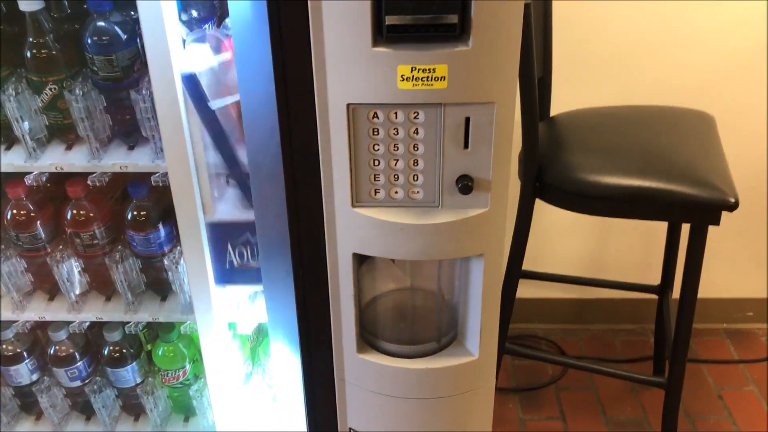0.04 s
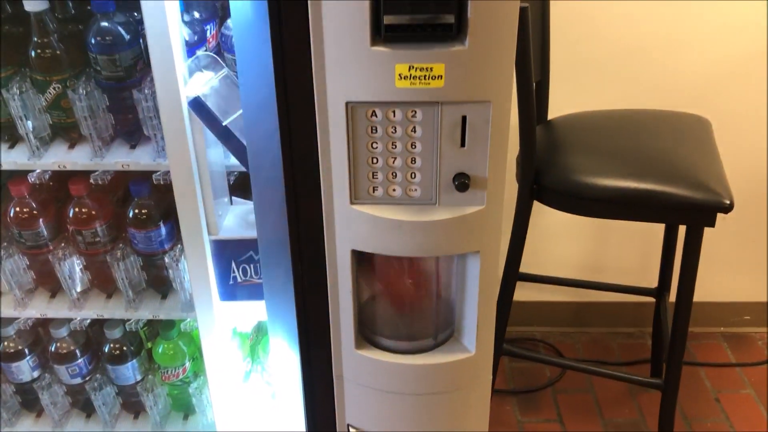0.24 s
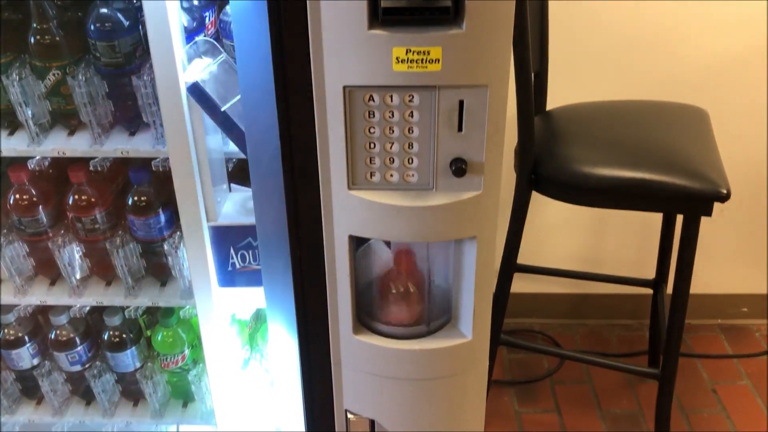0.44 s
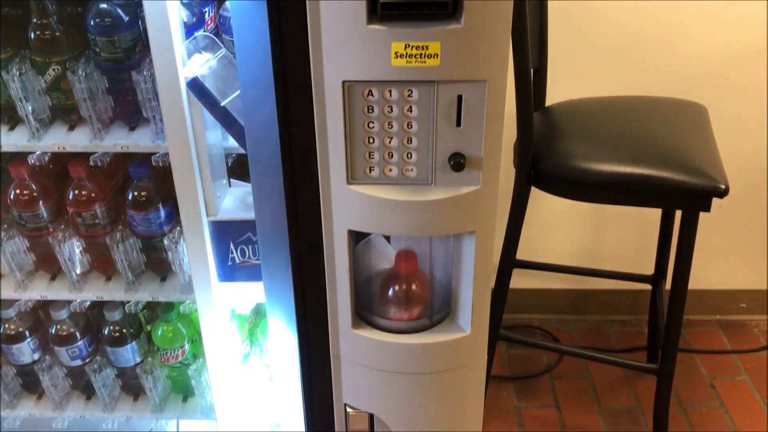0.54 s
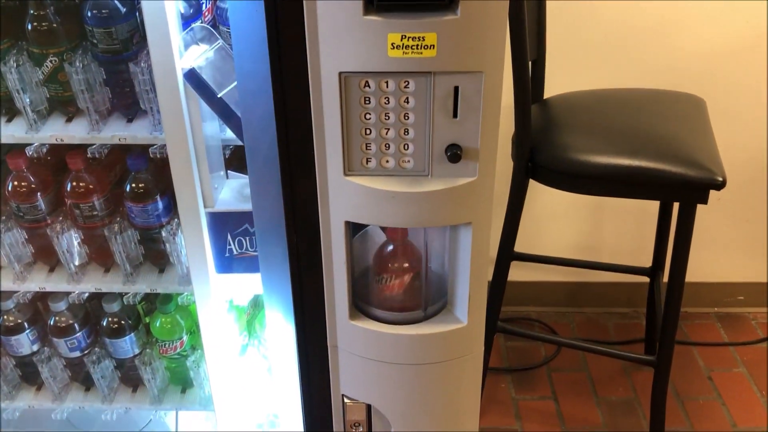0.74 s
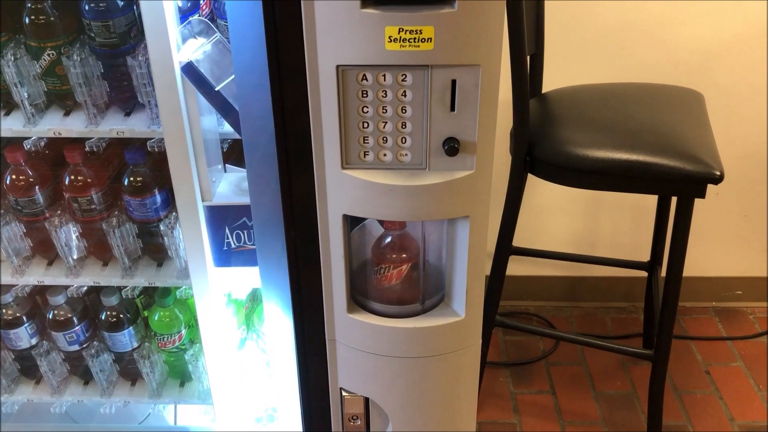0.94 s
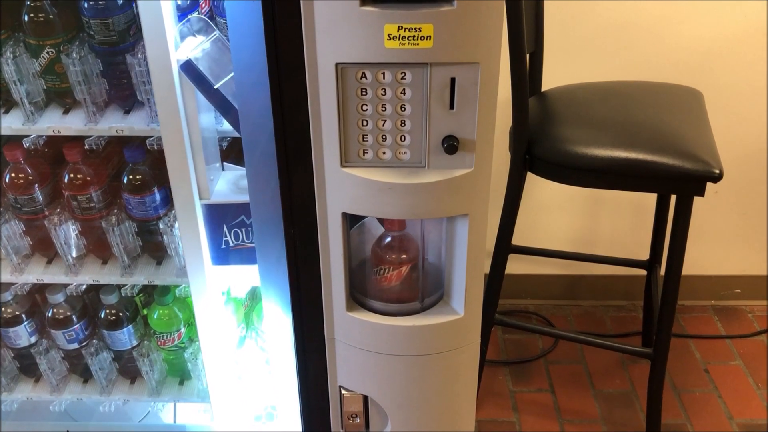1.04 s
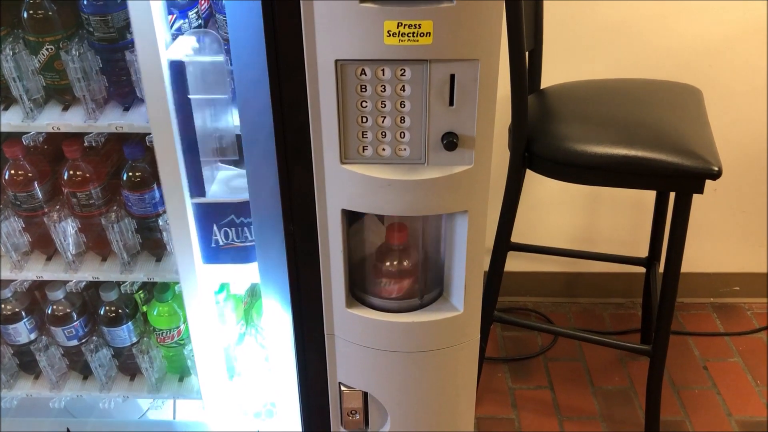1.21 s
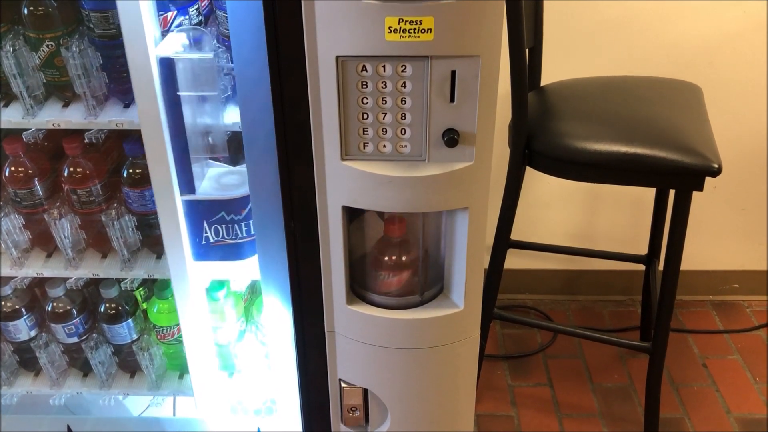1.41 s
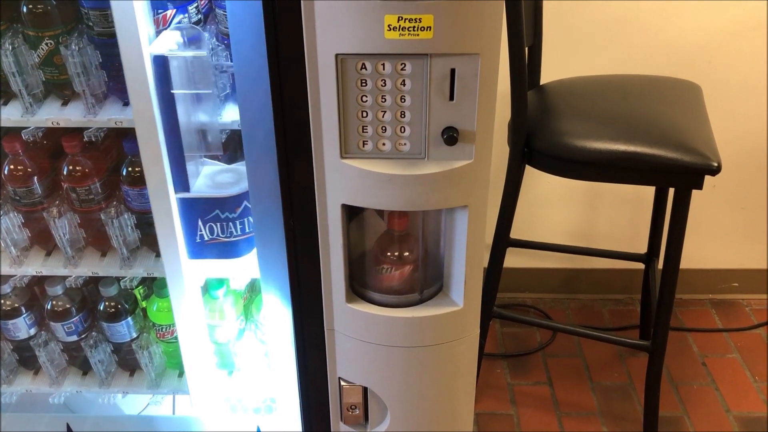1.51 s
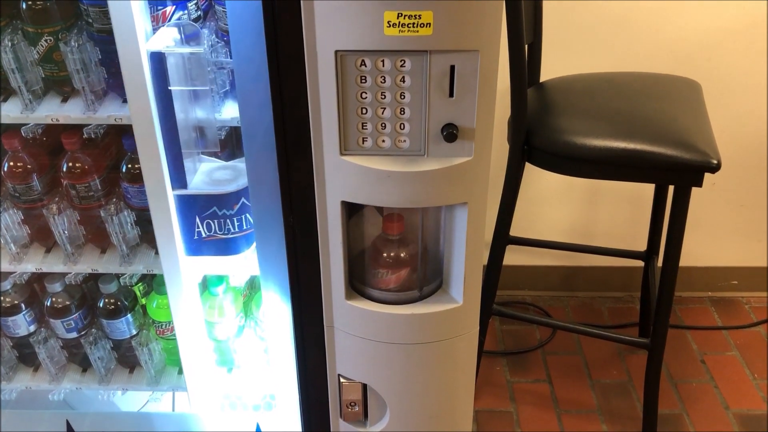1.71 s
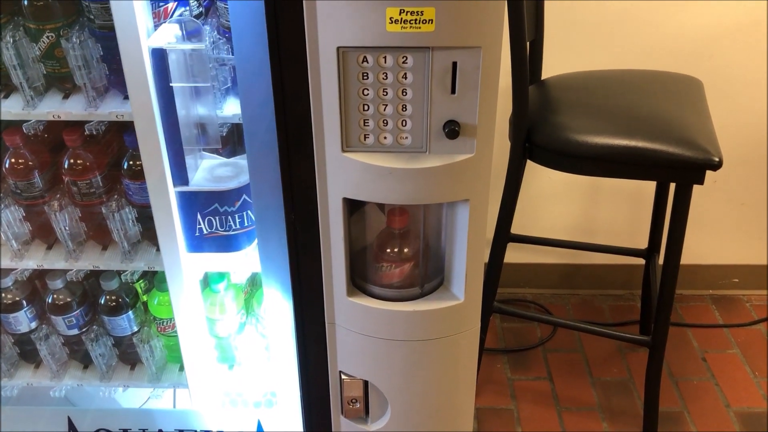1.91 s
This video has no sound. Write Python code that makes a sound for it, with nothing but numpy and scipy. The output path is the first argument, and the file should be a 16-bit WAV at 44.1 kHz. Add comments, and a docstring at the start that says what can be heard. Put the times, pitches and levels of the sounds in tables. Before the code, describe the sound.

A plastic bottle clatters down a vending machine's chute, thuds into the delivery port and rattles to rest. Then a steel latch snaps and the mechanism clunks twice, over a low cooling hum in a hard-floored room.

```python
"""A vending machine's cooling unit hums from start to finish. First a gate clicks open and a plastic
bottle knocks down the chute, ringing the delivery cup, crackling and cracking against edges.
It thuds into the port, shaking the cabinet, and rattles to rest. Then a steel latch ticks and snaps,
and the mechanism clunks twice, shaking the cabinet again. Every blow rings the cabinet's panels
and dies away in a hard-floored room."""
import sys
import numpy as np
from scipy import signal
from scipy.fft import rfft, irfft
from scipy.io import wavfile
from scipy.ndimage import uniform_filter1d

SR = 44100
rng = np.random.default_rng(int(sys.argv[2]) if len(sys.argv) > 2 else 0)


def materialize(psi):
    """Save the field psi as 16-bit PCM at rate SR to the path in sys.argv[1].

    A 1-D psi becomes a single channel; in a 2-D psi each row is a channel.
    """
    bounded = np.clip(np.atleast_2d(psi).T, -1, 1)
    quanta = np.round(bounded * 32767).astype(np.int16)
    wavfile.write(sys.argv[1], SR, quanta)


N = 85995

# motor and fan tones: pitch_hz, level_db, waver_db
HUM_TONES = [(117, -72, 4), (154, -57.5, 3), (232, -62, 4), (250, -66.5, 3), (306, -68, 4),
             (370.5, -57, 1.3)]
# tone colour of the fan's moving air: pitch_hz, level_db
AIR_COLOUR = [(18, -65), (30, -23), (100, -12.5), (134, -9.5), (252, -6.5), (311, -17.5), (384, -8),
              (449, -19), (666, -21), (740, -24.5), (1190, -30), (1630, -34), (2120, -41), (8520, -53.5),
              (16000, -59)]
# the bottle's blows; thud to tick are five bands, low to high, each added to level_db:
# start_s, level_db, thud_db, boom_db, knock_db, clack_db, tick_db, fade_factor
BOTTLE_HITS = [ (0.078, -48.5, -22, 2.5, -3, -3.5, -2, 1.3), (.108, -51, 6.5, 2, -3, -12.5, -30, 3.9),
               (.137, -44, -9, -1.5, -6, -12, -10.5, 2.6), (0.158, -46.5, -2, 2, -5, -7, -6.5, 1.1),
               (0.186, -47, -10.5, 8, -3, -6.5, -10, 4.8), (.225, -30.5, -16, -5.5, -3.5, -2, -5, 1),
               (.263, -49, -6, -11.5, 4, -5, 0.5, 2.6), (.278, -36, 6.5, -16, -4, -2, 0.5, 1.1),
               (.283, -34, -9, -13, 4, 1.5, 1, 0.5), (.289, -28.5, -6, 2, -1, -3, -3, 0.76),
               (0.31, -31, -17.5, -11, -0.5, -1.5, -4, 0.85), (0.329, -37, -6, 2.5, 3.5, 1.5, -5.5, 1.2),
               (.366, -34, -10.5, 0, 5.5, -5, -12.5, 0.54), (0.377, -28, -12.5, -6, 1, -7.5, -16, 1.4),
               (.396, -36.5, -9, -2, 0, -1, -16, 0.81), (0.407, -27.5, -5, -7.5, 1, -3.5, -6, 1.5),
               (0.427, -27.5, -2, 1.5, -1.5, -0.5, -9, 1.27), (0.44, -36, 1, -5, 5.5, -14, -16, 0.69),
               (0.448, -34.5, -19, 3, -10.5, 0.5, -0.5, 0.79),
               (.460, -27, -22.5, -8, -2.5, -7.5, -5.5, 1.18), (0.485, -27.5, -21, -6.5, 0, -6, -13, 0.47),
               (0.506, -40.5, -13, 4, 4, 0.5, 2.5, 1.6), (.520, -36, -8, 3, 3, 4, -5.5, 1.4),
               (0.528, -31, -20, -8, 4, -19, -15, 0.86), (0.541, -36.5, -3, -9, -13, 4.5, -6, 0.82),
               (0.554, -33, -15, -22, 4.5, 0.5, -6, 1.3), (.566, -41, -10, -11, 6, -4, -2, 1.2),
               (0.582, -33.5, -2.5, 3.5, 4, -2, -7, 1.8), (0.61, -30, -2, -1, -1.5, -5.5, -9.5, 1.37),
               (0.64, -40, -2.5, 2.5, -2.5, 1.5, 0.5, 0.9), (0.656, -36, -6.5, -0.5, 5, -17, -1.5, 0.48),
               (0.67, -41.5, 6.5, -8, 2, -7, -7, 1.15), (0.698, -49.5, 10.5, 0, 4, -19, -11, 0.88),
               (.745, -55, 13, -2, -28, -81, -26, 0.9), (0.797, -57.5, 4.5, 13, -3.5, -18, -4.5, 0.52),
               (.832, -62, 9, 13, -7, -5, -4, 0.82), (0.869, -57, 7.5, 1.5, -7.5, -10, -11, 2.4),
               (.931, -67, 0, -1, -13, -3, -6.5, 2)]
# how the cabinet answers in those bands (a fade is a 60 dB drop): pitch_hz, rise_s, hold_s, fade_s
CABINET_BANDS = [(75.2, 0.0074, 0.0069, .2), (237, 0.012, 0.01, 0.14), (842, 0.0044, 0.0068, 0.17),
                 (2990, 0.0024, 0.0081, 0.11), (8600, 0.0025, 0.0048, 0.086)]
# tone colour of the bottle's blows: pitch_hz, level_db
BOTTLE_COLOUR = [(18, -29), (30, -24), (75, 2), (149, -1.5), (319, -3), (374, -3), (473, -7), (584, -2.5),
                 (780, -6.5), (1010, -7), (1500, -10.5), (3220, -10), (16000, -30)]
# where bottle, chute and port ring: pitch_hz, width_hz, boost_db
PORT_RESONANCES = [(209, 41, 6), (229, 32, 2), (291, 7.1, 3), (372.5, 17, 5.5), (526, 37, 5.5),
                   (591, 9.5, 3.5), (687, 16, 5.5), (819, 12.7, 7.5), (876, 17, 6), (969, 13, 9),
                   (1015.6, 37, 7), (1243, 19, 0.5), (1315, 33, 8), (1698, 12, 9.5), (1905, 29, 4.5),
                   (2019, 37, 8), (3223, 166, 5), (3730, 32, -3.5)]
# notes of the hollow delivery cup: pitch_hz, level_db, fade_s
CUP_NOTES = [(519, -19, .2), (586, -22, .2), (830, -17, .16), (964, -19, .2), (1023, -7.5, .18)]
# clicks of the gate: start_s, level_db, pitch_factor
GATE_CLICKS = [(.080, -49, .84), (.226, -36.5, 1.), (.312, -40, 1.)]
# notes of the gate: pitch_hz, level_db, fade_s
GATE_NOTES = [(520, -5, .2), (905, -4, .1), (1190, -8, .14), (1335, -7, .09), (1600, -9, .1),
              (2003, 0, .13), (2589, -4, .09), (3260, -7, .11), (3967, -8, .08)]
# the bottle striking edges: start_s, level_db, brightness_hz
EDGE_HITS = [(0.2251, -38.5, 6900), (0.2817, -37, 7000), (0.3688, -24, 1710), (.4075, -32.5, 8100),
             (.431, -35, 3600), (.451, -38, 4500), (.464, -30, 6660), (0.509, -45, 5170),
             (0.522, -45, 3000), (.612, -32.5, 2320), (0.6553, -37, 1710), (0.6631, -36.5, 1720)]
# heavy landings: start_s, level_db, pitch_factor
THUMPS = [(.435, -26, 0.936), (1.384, -37, 0.86)]
# lowest notes of the cabinet: pitch_hz, level_db, fade_s
CABINET_NOTES = [(61.6, -2.5, 0.22), (111, -1, 0.041), (162, -4, 0.099)]
# the mechanism's blows: start_s, level_db, thud_db, boom_db, knock_db, clack_db, tick_db, fade_factor
LATCH_HITS = [ (1.128, -63.5, 6, 2, 4, -2.5, -4, 1.9), (1.203, -37, -12, -4, -1.5, 0, -5.5, 0.81),
              (1.241, -48, 6.5, 6, 0, -3.5, -6.5, 2.7), (1.311, -53, 14, 4, 4, -3, -4, 1.),
              (1.324, -38, -8, 0.5, -0.5, -1.5, 0, 1.3), (1.342, -44.5, -7, 8.5, 6, -4, -20, 0.57),
              (1.367, -36.5, -12, 3, -1, -0.5, 0, 0.72), (1.390, -45, 1.5, 4.5, -4.5, -6.5, -16, 3.05)]
# tone colour of the mechanism's blows: pitch_hz, level_db
LATCH_COLOUR = [(18, -31), (30, -24), (59, 5), (93, 2), (295, 2.5), (328, -0.5), (437, -2.5), (540, -11),
                (1010, -9), (2060, -13), (2230, -17.5), (5040, -17.5), (16000, -29)]
# where the panel behind the latch rings: pitch_hz, width_hz, boost_db
PANEL_RESONANCES = [(138, 6.2, 1.5), (195, 7.1, 7), (295, 12.6, 6.5), (445, 30, 7), (824, 15, 6),
                    (1030, 15, 3.5), (1487, 22, 5.5), (1730, 19, -8), (1980, 24, 7), (4970, 240, 5)]
# tick and snaps of the latch: start_s, level_db, pitch_factor
LATCH_SNAPS = [(1.132, -71, 1.22), (1.204, -37.5, 1.), (1.368, -52, 1.)]
# notes of the steel latch: pitch_hz, level_db, fade_s
LATCH_NOTES = [(770, -2, .22), (870, -5, .16), (985, 0, .22), (1198, -4, .13), (1647, -2, .14),
               (1968, -6, .16), (2369, -5, .12), (2570, -1, .11), (2625, -3, .11), (2702, -3, .13),
               (3380, -9, .05), (4255, -8, .17), (4370, -10, .08), (4445, -8, .13), (4820, -16, .15),
               (5240, -11, .14), (6000, -14, .08), (6433, -13, .11)]
# the room's echo: pitch_hz, fade_s, level_db
ROOM_BANDS = [(74.8, 0.47, -9.5), (244, 0.63, -5.5), (820, 0.51, -12.5), (2700, 0.65, -14),
              (5460, 0.54, -12.5), (11600, 0.31, -17.5)]


def gain(db):
    """Turn decibels into a number to multiply by."""
    return 10 ** (np.asarray(db) / 20)


def normalise(x):
    """Scale a sound to an average power of 1."""
    return x / np.sqrt(np.mean(x ** 2))


def fade(age, fade_s):
    """Die away by 60 dB every fade_s seconds."""
    return np.exp(-np.log(1000) * age / fade_s)


def curve(pitches_hz, values):
    """Join points with straight lines across the spectrum, octaves evenly spaced."""
    hz = np.arange(N // 2 + 1) * SR / N
    return np.interp(np.log(np.maximum(hz, 1)), np.log(pitches_hz), values)


def noise_spectrum(colour):
    """The spectrum of a noise with the given tone colour."""
    return rfft(rng.standard_normal(N)) * gain(curve(*np.array(colour).T))


def split(spectrum, bands):
    """Split a spectrum into overlapping sounds, one for each band."""
    centres_hz = [band[0] for band in bands]
    shares = np.array([curve(centres_hz, row) for row in np.eye(len(bands))]) ** 4
    return [irfft(spectrum * share, N) for share in shares / shares.sum(0)]


def wander(rate_hz):
    """A smooth random wobble, about 1 in size."""
    width = max(int(SR / rate_hz), 2)
    smoothed = uniform_filter1d(rng.standard_normal(N), width, mode="wrap")
    return normalise(uniform_filter1d(smoothed, width, mode="wrap"))


def ring(x, resonances):
    """Each resonance boosts or dips a narrow range of pitch and rings on."""
    out = x
    for hz, width_hz, boost_db in resonances:
        ringing = signal.lfilter(*signal.iirpeak(hz, hz / width_hz, fs=SR), x)
        out = out + (gain(boost_db) - 1) * ringing
    return out


def blows(hits, colour, chatter_db, chatter_s=0.00042):
    """Blows ring so many panel notes that they blur into noise; the lows come late and linger."""
    t, out = np.arange(N) / SR, np.zeros(N)
    chatter = normalise(gain(chatter_db * wander(1 / chatter_s)))
    bands = split(noise_spectrum(colour), CABINET_BANDS)
    for k, (band, (hz, rise_s, hold_s, fade_s)) in enumerate(zip(bands, CABINET_BANDS)):
        power = np.zeros(N)
        for start, db, *band_db, fade_factor in hits:
            age = np.maximum(t - start, 0)
            rise = np.sin(np.pi / 2 * np.minimum(age / rise_s, 1)) ** 2
            fall = fade(np.maximum(age - hold_s, 0), fade_s * fade_factor)
            power += (gain(db + band_db[k]) * rise * fall) ** 2
        window = int(SR * max(2 / hz, .006))
        steady = band / np.sqrt(uniform_filter1d(band ** 2, window) + 1e-18)
        out += steady * np.sqrt(power) * (chatter if k > 2 else 1)  # the contact chatters in the treble
    return out


def struck(strikes, notes, rise_s=0.0057, detune=0.00095):
    """Every strike sets an object's notes ringing, each fading at its own rate."""
    age, out = np.arange(SR // 3) / SR, np.zeros(N + SR)
    rise = np.minimum(age / rise_s, 1)
    for start, db, pitch_factor in strikes:
        at = int(start * SR)
        for hz, note_db, fade_s in notes:
            pitch_hz = hz * pitch_factor * (1 + detune * rng.standard_normal())
            tone = np.sin(2 * np.pi * (pitch_hz * age + rng.random()))
            out[at:at + len(age)] += gain(db + note_db) * rise * fade(age, fade_s) * tone
    return out[:N]


def cooling_unit(air_db=-56, waver_hz=7.3, drift=0.0026):
    """Motor and fan tones waver over the rush of moving air."""
    out = gain(air_db) * normalise(irfft(noise_spectrum(AIR_COLOUR), N))
    for hz, db, waver_db in HUM_TONES:
        pitch_hz = hz * (1 + drift * wander(waver_hz))
        tone = np.sin(2 * np.pi * (np.cumsum(pitch_hz) / SR + rng.random()))
        out += gain(db) * normalise(tone * gain(waver_db * wander(waver_hz)))
    return out


def bottle_knocks(level_db=-3.5):
    """The full bottle knocks down the chute and rocks in the port."""
    return gain(level_db) * ring(blows(BOTTLE_HITS, BOTTLE_COLOUR, chatter_db=1), PORT_RESONANCES)


def cup_ring(level_db=-0.5):
    """Each knock of the bottle rings the hollow delivery cup."""
    strikes = [(start, db + knock_db, 1) for start, db, _, _, knock_db, *_ in BOTTLE_HITS]
    return gain(level_db) * struck(strikes, CUP_NOTES)


def plastic_crackle(knocks, level_db=-21.5, cracks_per_s=240, spread_db=0.5, crack_s=0.00043):
    """The bottle's thin skin crackles at random, as strongly as the knocks that bend it."""
    age = np.arange(SR // 100) / SR
    cracks = (rng.random(N) < cracks_per_s / SR) * gain(spread_db * rng.standard_normal(N))
    bursts = signal.fftconvolve(cracks, np.exp(-age / crack_s))[:N] * rng.standard_normal(N)
    bright = signal.sosfilt(signal.butter(1, [3500, 11000], "band", fs=SR, output="sos"), bursts)
    knock_power = signal.sosfilt(signal.butter(2, 900, "high", fs=SR, output="sos"), knocks) ** 2
    memory = np.exp(-1 / (0.042 * SR))  # bending builds up over about 42 ms
    bend = np.sqrt(signal.lfilter([1 - memory], [1, -memory], knock_power))
    knock_level = np.sqrt(uniform_filter1d(knock_power, SR // 100) + 1e-14)
    return gain(level_db) * normalise(bright) * np.minimum(bend, knock_level)


def gate_clicks(level_db=5):
    """The metal gate clicks and rings as it lets the bottle go."""
    return gain(level_db) * struck(GATE_CLICKS, GATE_NOTES)


def edge_cracks(fade_s=0.022, width_octaves=1.43):
    """The bottle's cap or base hits a hard edge with a sudden, short crack."""
    age, out = np.arange(SR // 20) / SR, np.zeros(N + SR)
    for start, db, hz in EDGE_HITS:
        limits_hz = hz * 2 ** (width_octaves * np.array([-.5, .5]))
        band_filter = signal.butter(2, limits_hz, "band", fs=SR, output="sos")
        crack = normalise(signal.sosfilt(band_filter, rng.standard_normal(len(age))))
        at = int(start * SR)
        out[at:at + len(age)] += gain(db) * crack * fade(age, fade_s)
    return out[:N]


def cabinet_thumps():
    """Heavy landings shake the whole cabinet at its lowest notes."""
    return struck(THUMPS, CABINET_NOTES, rise_s=0.0044)


def mechanism_clunks(level_db=-2.5):
    """The port's mechanism knocks and rings the panel behind the latch."""
    return gain(level_db) * ring(blows(LATCH_HITS, LATCH_COLOUR, chatter_db=-0.5), PANEL_RESONANCES)


def latch_snaps(level_db=-2):
    """The steel latch rings with a light tick, a loud snap, then a softer one."""
    return gain(level_db) * struck(LATCH_SNAPS, LATCH_NOTES)


def room_echo(x, rise_s=0.0067):
    """Reflections blur into a tail with its own length and level in each band."""
    t, tail = np.arange(N) / SR, 0
    bands = split(rfft(rng.standard_normal(N)), ROOM_BANDS)
    for band, (_, fade_s, db) in zip(bands, ROOM_BANDS):
        shape = np.minimum(t / rise_s, 1) * fade(t, fade_s)
        tail = tail + gain(db) * band * shape / np.sqrt(np.sum(shape ** 2))
    return signal.fftconvolve(x, tail)[:N]


def scene():
    """Over the hum, the bottle falls and the latch snaps, both echoing in the room."""
    hum = cooling_unit()
    knocks = bottle_knocks()
    fall = knocks + cup_ring() + plastic_crackle(knocks) + gate_clicks() + edge_cracks()
    impacts = fall + cabinet_thumps() + mechanism_clunks() + latch_snaps()
    return (hum + impacts + room_echo(impacts))[None]


def record(dry, low_hz=38.2, top_hz=16100):
    """A small microphone drops the deep bass; the highest treble is cut too."""
    thin = signal.sosfilt(signal.butter(4, low_hz, "high", fs=SR, output="sos"), dry)
    return signal.sosfilt(signal.ellip(10, .2, 70, top_hz, fs=SR, output="sos"), thin)


dry = scene()
out = record(dry)
materialize(out)
```